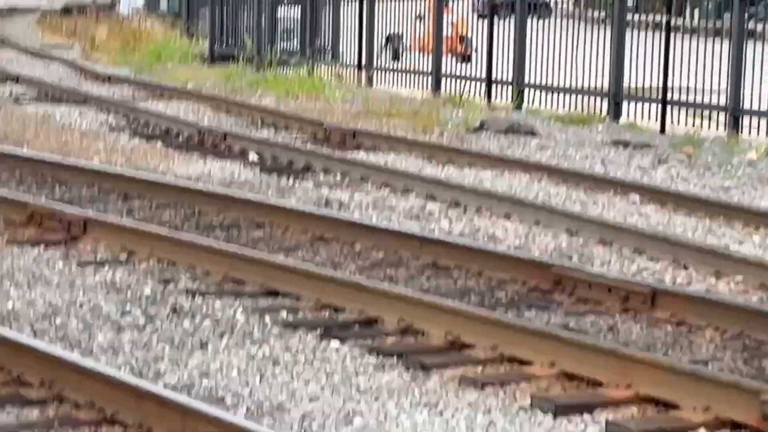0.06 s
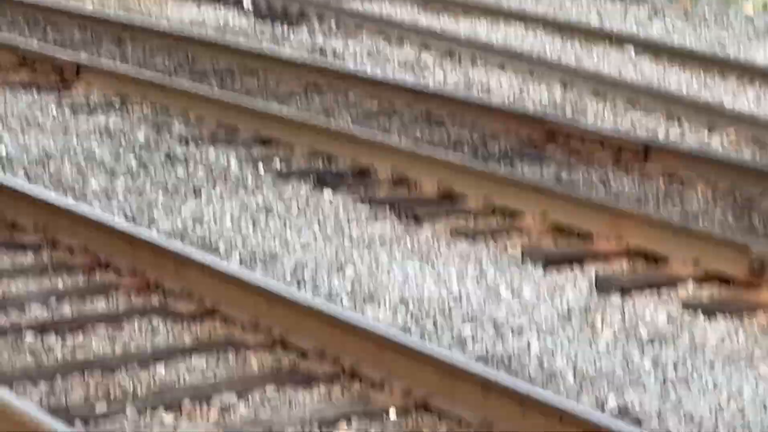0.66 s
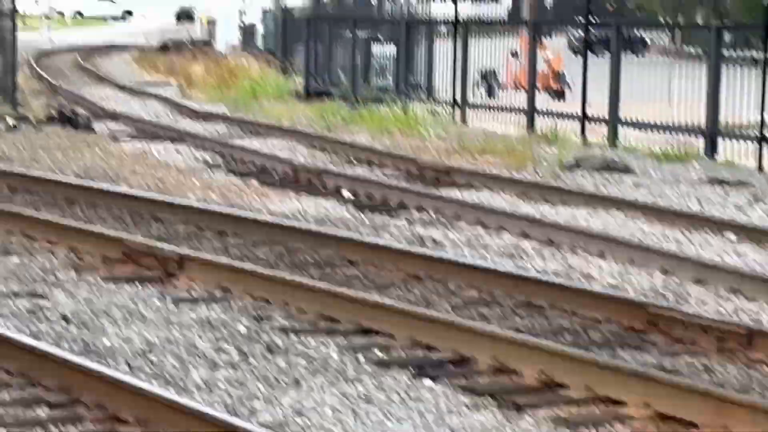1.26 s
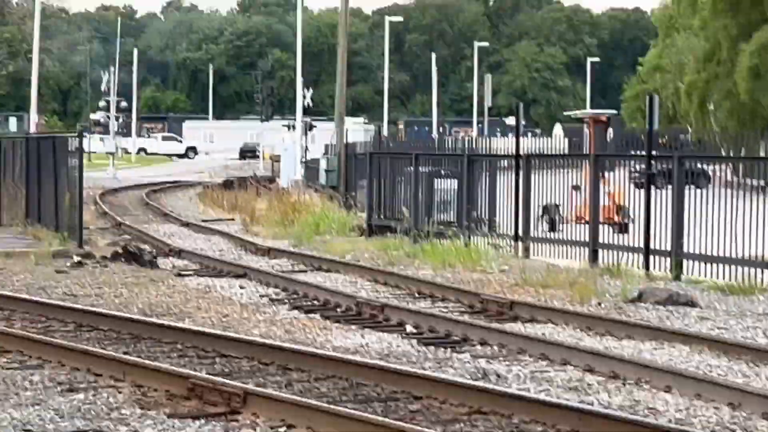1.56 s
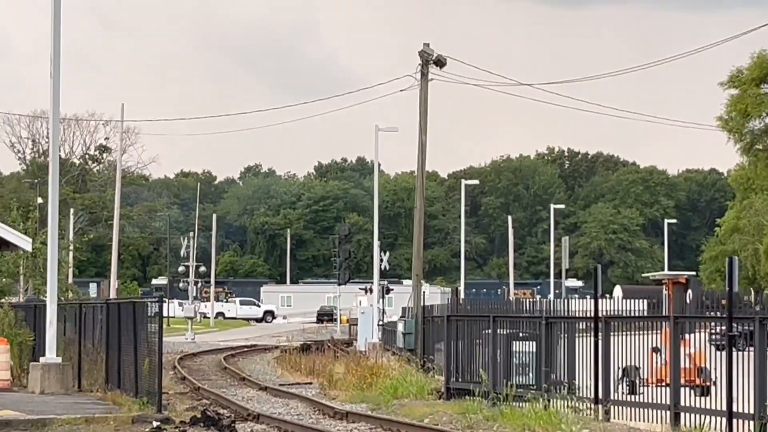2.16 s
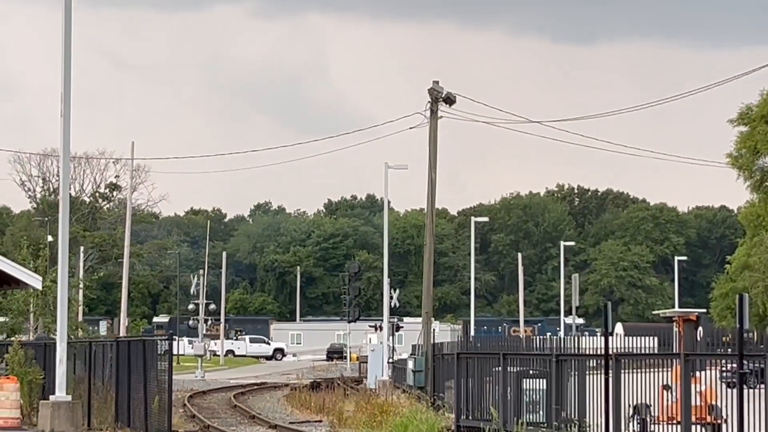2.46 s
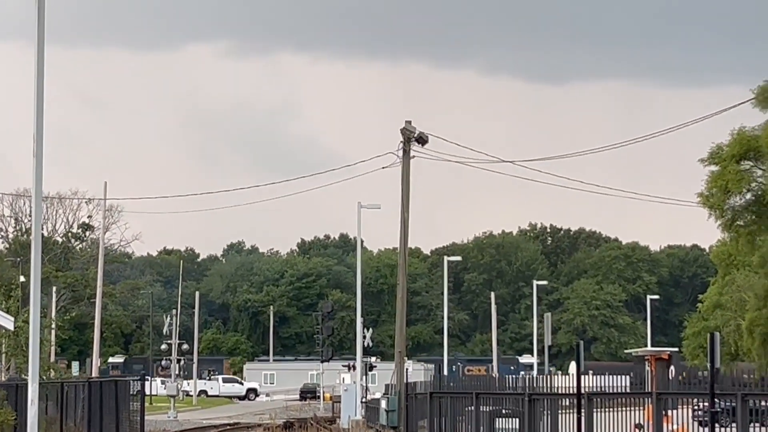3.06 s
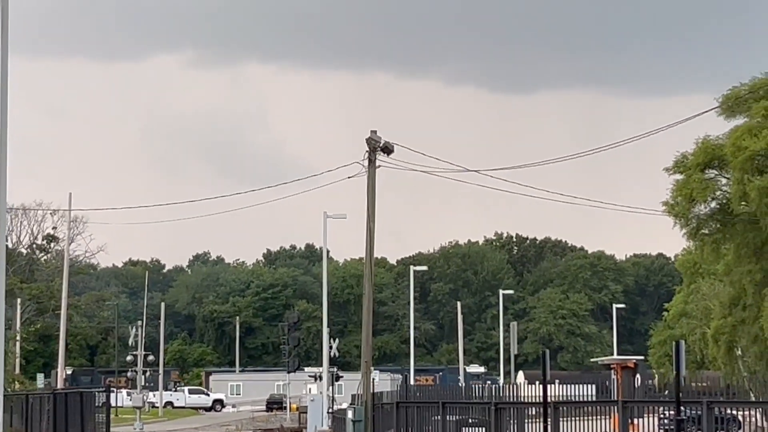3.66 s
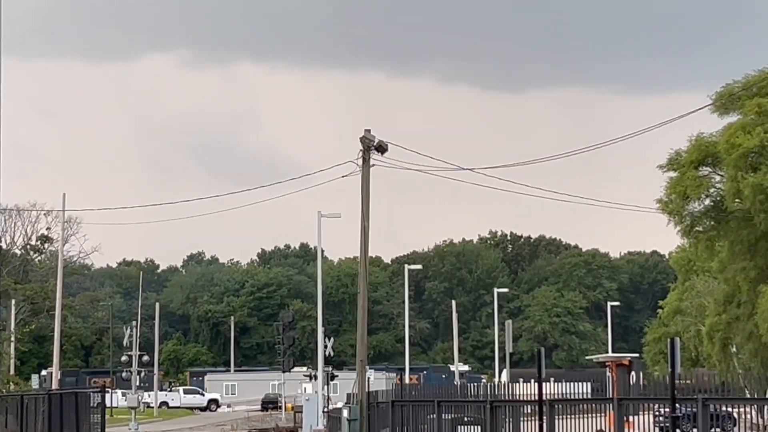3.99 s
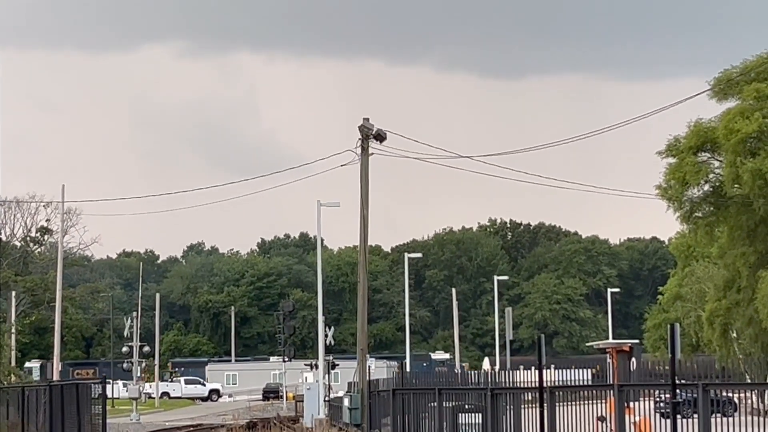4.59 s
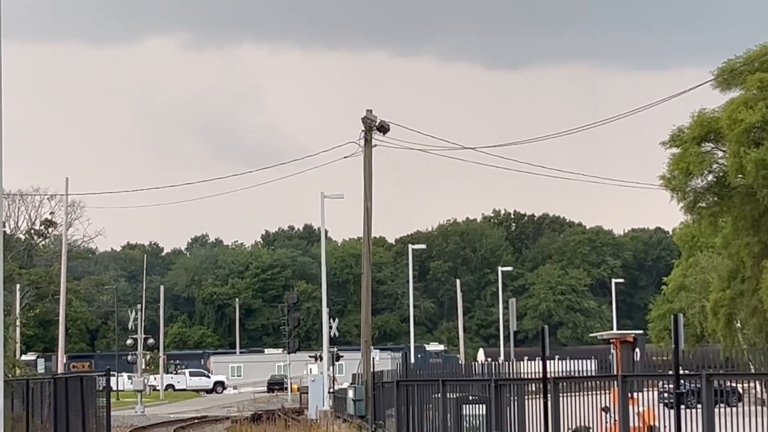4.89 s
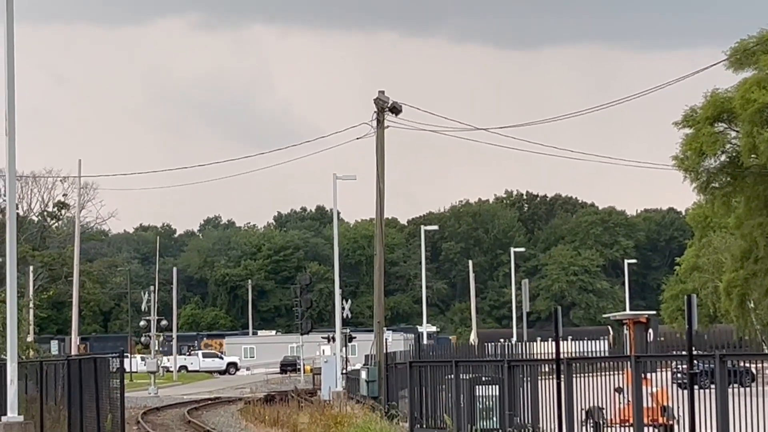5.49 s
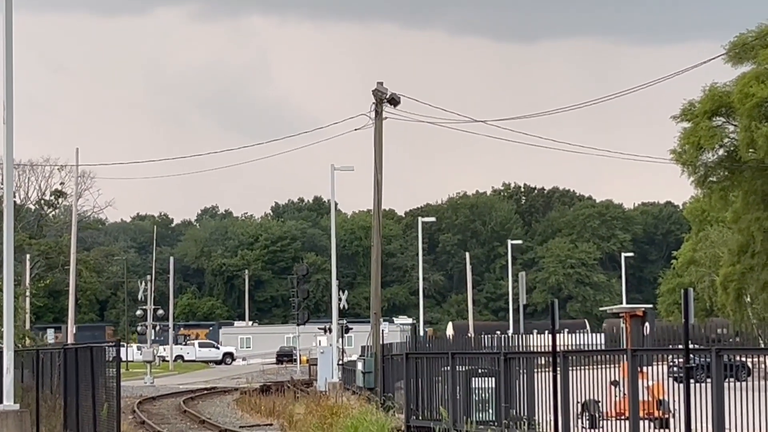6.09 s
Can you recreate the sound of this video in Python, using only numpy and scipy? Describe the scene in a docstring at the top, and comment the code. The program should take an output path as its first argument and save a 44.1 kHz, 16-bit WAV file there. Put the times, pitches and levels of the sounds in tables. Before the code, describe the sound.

A freight train creeps by with a low diesel throb and rumble, its wheels squealing in thin, high tones.

```python
"""Freight train creeping through a yard

Diesel exhaust throbs low, a gear hum climbs in pitch and rough wheels roar on the rails, cracking grit.
Car bodies knock, boom and growl. Flanges rub in a curve and set the wheels singing in thin, high tones
that swell, chirp and fade. It is all heard in stereo on a phone beside a crossing."""
import sys
import numpy as np
from scipy import signal
from scipy.fft import rfft, irfft
from scipy.io import wavfile
from scipy.ndimage import uniform_filter1d

SR = 44100
rng = np.random.default_rng(int(sys.argv[2]) if len(sys.argv) > 2 else 0)


def master(y):
    """Save y as 16-bit WAV."""
    cut = np.clip(np.atleast_2d(y).T, -1, 1)
    pcm = np.round(cut * 32767)  # scale
    wavfile.write(sys.argv[1], SR, pcm.astype(np.int16))


N = 279594
TIME = np.arange(N) / SR
FREQ = np.maximum(np.arange(N // 2 + 1) * SR / N, 1)

# colour of steel hissing on steel, rolling or scraping: (frequency [Hz], relative level [dB])
STEEL_HISS = [(2800, -18.5), (3600, -1), (4500, -3.5), (5200, -3.5), (6000, -8), (7000, -10), (8300, -21.5),
              (10000, -43.5)]


def undb(db):
    """Decibels to gain."""
    return 10 ** (np.asarray(db) / 20)


def curves(table):
    """One envelope per value column, in straight lines between the table's times."""
    times, *columns = np.transpose(table)
    return [np.interp(TIME, times, column) for column in columns]


def across(hz, values):
    """Values joined by straight lines on a log-frequency axis."""
    return np.interp(np.log(FREQ), np.log(hz), values)


def unit(x):
    """Scale to rms 1."""
    return x / np.sqrt(np.mean(x ** 2))


def noise(gain):
    """Mono noise with the given gain at each frequency, rms 1."""
    return unit(irfft(rfft(rng.standard_normal(N)) * gain, N))


def drift(hz, steps=4096):
    """Smooth random modulation that changes about hz times a second, rms 1."""
    rates = np.arange(steps // 2 + 1) * SR / N
    slow = irfft(rfft(rng.standard_normal(steps)) / (1 + (rates / hz) ** 4))
    return np.interp(TIME, np.linspace(0, N / SR, steps), unit(slow))


def place(x, pan_db):
    """Pan a mono sound, louder on the left by pan_db."""
    return x * undb(np.array([[pan_db], [-pan_db]]) / 2)


def stereo_noise(gain):
    """Noise at two microphone ports: a shared part shifted in phase, plus a diffuse part for each."""
    # stereo image: (frequency [Hz], left minus right [dB], left phase lead [rad], coherence [0-1])
    image = [(90, -0.5, -0.05, 1.0), (280, -2.1, 0.56, 0.95), (700, 0.8, 1.01, 0.8),
             (1100, -0.4, 1.72, 0.6), (1500, -7.4, 3.12, 0.72), (1850, -8.6, 0.59, 0.82),
             (2600, -1.6, 0.36, 0.97), (4000, -0.0, 0.08, 0.98), (5000, 0.1, -0.12, 0.98),
             (6400, -0.1, -0.99, 0.93), (7400, 0.0, -1.81, 0.77), (8500, -0.0, -3.14, 0.95),
             (9600, -0.0, 2.13, 0.74), (12000, 0.0, -0.0, 1.0)]
    hz, balance_db, lead, coherence = np.transpose(image)
    shared = np.clip(across(hz, coherence), 0, 1)
    to_left = undb(across(hz, balance_db) / 2) * np.exp(.5j * across(hz, np.unwrap(lead)))
    white = rfft(rng.standard_normal((3, N)))
    blend = np.sqrt(shared) * white[0] + np.sqrt(1 - shared) * white[1:]
    pair = irfft(gain * np.array([to_left, 1 / to_left]) * blend, N)
    return pair / np.std(pair.mean(0))


def wash(colour, flicker_db, flicker_hz):
    """A broad bed of noise whose level flickers."""
    hz, db = np.transpose(colour)
    skirts = np.minimum(FREQ / hz[0], 1) ** 4 * np.minimum(hz[-1] / FREQ, 1) ** 4
    return stereo_noise(undb(across(hz, db)) * skirts) * undb(flicker_db * drift(flicker_hz))


def sing(modes, steady=0.5, settle_s=0.048):
    """Resonances kept ringing by noise, as by friction; steady (0-1) evens out their joint loudness."""
    power = sum(undb(2 * db) / width / (1 + ((FREQ - hz) / width) ** 2) ** 2 for hz, width, db in modes)
    total_gain = np.sqrt(sum(undb(2 * db) for _, _, db in modes))
    ringing = stereo_noise(np.sqrt(power))
    loudness = np.sqrt(uniform_filter1d(np.mean(ringing ** 2, axis=0), int(settle_s * SR)))
    return unit(ringing / loudness ** steady) * total_gain


def turns(hz):
    """Phase of something turning at hz, from a random start."""
    return 2 * np.pi * (np.cumsum(hz) / SR + rng.random())


def hum(hz, wander, waver_db, overtone_db, rough=0):
    """A machine tone and its octave, wavering in pitch and level; rough adds a fast flutter."""
    phase = turns(hz * (1 + wander * drift(12.09)))
    octave = np.sin(2 * phase + drift(25)) * undb(overtone_db)
    waver = undb(waver_db * drift(2.2))
    flutter = unit(1 + rough * drift(26))
    return np.sqrt(2) * (np.sin(phase) + octave) * waver * flutter


def nearness(pass_s=1.5, late_s=0, closest_s=1.59):
    """How near the noisiest wheels seem: 1 at closest_s + late_s, a half pass_s before and after."""
    return np.exp(-((TIME - closest_s - late_s) / pass_s) ** 2 * np.log(2))


def passing(far_db, swell_db, pass_s, late_s=0):
    """Pass-by gain: up from the distant level by swell_db, then back down."""
    return undb(far_db + swell_db * nearness(pass_s, late_s))


def rubbing(cue, idle_db, attack_s=0.075, release_s=.08):
    """Gain of one sound: light steady contact, rubs that build, hold and ring out, and brief chirps."""
    # a wheel bears on the rail: (full strength from [s], hold [s], level [dB], cue label)
    rubs = [(0, 0.46, -42, "tread"), (.65, .25, -48, "tread"), (1.2, .5, -42.5, "tread"),
            (1.95, .6, -46.5, "tread"), (3.85, .2, -48, "tread"), (.45, 0.27, -56, "scrape"),
            (1.45, 0.28, -51.5, "scrape"), (2.3, 0.33, -51, "scrape"), (4.0, .45, -51.5, "scrape"),
            (4.8, 0.14, -53.5, "scrape"), (1.52, .08, -41, "growl"), (2.18, .06, -37.5, "growl"),
            (2.92, .3, -36.5, "growl"), (0, .45, -39, "boom"), (4.15, .62, -35, "boom"),
            (0, .5, -48, "groan"), (6.08, .1, -46.5, "groan"), (1.47, .6, -59, "first"),
            (2.15, .87, -49.5, "first"), (3.1, .4, -59, "first"), (3.52, .65, -51.5, "first"),
            (4.22, 1.3, -49.5, "first"), (5.62, .72, -53.5, "first"), (.3, .2, -54, "second"),
            (1.54, .17, -54, "second"), (2.44, .1, -46.5, "second"), (2.7, .75, -49, "second"),
            (4.26, .05, -49.5, "second"), (5.0, .55, -54.5, "second"), (6.21, .1, -46.5, "second"),
            (.04, .11, -46, "third"), (.45, 1.25, -55, "third"), (2.24, .24, -46.5, "third"),
            (2.87, .5, -54, "third"), (4.26, .05, -53, "third"), (5.3, .33, -45.5, "third"),
            (1.42, .32, -54, "fourth"), (4.3, .28, -55, "fifth"), (6.05, .25, -59, "fifth"),
            (2.26, .17, -50.5, "sixth"), (0, .13, -58, "low"), (4.0, 1.1, -57.5, "low"),
            (5.85, .49, -62, "low"), (0, .1, -57, "high"), (3.97, .26, -50.5, "high"),
            (4.32, .11, -55, "high"), (4.58, .1, -63, "high"), (4.85, .28, -60.5, "high"),
            (5.3, .6, -69, "high"), (0, .08, -54.5, "thin"), (4.06, .19, -52, "thin"),
            (4.35, .15, -58.5, "thin"), (4.78, .26, -56, "thin"), (5.19, .04, -56.5, "thin"),
            (5.8, .16, -58, "thin"), (6.22, .12, -58, "thin"), (1.57, .05, -65, "top"),
            (4.06, .14, -59, "top"), (4.47, .05, -60, "top"), (4.98, .2, -61, "top"),
            (2.85, .4, -68, "whistle")]
    # a flange catches and lets go at once: (peak time [s], length [s], level [dB], cue label)
    chirps = [(2.22, .04, -46, "first"), (2.98, .05, -48, "first"), (3.5, .04, -48, "first"),
              (3.96, .025, -45, "first"), (4.24, .05, -44, "first"), (4.31, .03, -42.5, "first"),
              (4.44, .025, -44.5, "first"), (4.58, .025, -46, "first"), (4.66, .025, -46, "first"),
              (4.82, .03, -48, "first"), (4.97, .05, -40, "first"), (5.09, .04, -47, "first"),
              (5.17, .06, -46.5, "first"), (5.28, .035, -44, "first"), (5.41, .055, -45.5, "first"),
              (5.5, .04, -47.5, "first"), (5.72, .035, -44, "first"), (5.765, .025, -43.5, "first"),
              (6.13, .03, -49, "first"), (5.79, .05, -48.5, "second"), (6.04, .08, -44.5, "second"),
              (5.99, .035, -44, "squeak"), (4.26, .03, -50.5, "screech"), (4.4, .07, -45, "screech"),
              (4.85, .03, -55, "screech"), (5.0, .07, -51.5, "screech")]
    power = undb(2 * idle_db)
    for start, hold, db, label in rubs:
        if label == cue:
            before, after = np.maximum(start - TIME, 0), np.maximum(TIME - start - hold, 0)
            power = power + (undb(db) * np.exp(-before / attack_s - after / release_s)) ** 2
    for peak, length, db, label in chirps:
        if label == cue:
            power = power + undb(2 * db) * .5 ** ((2 * (TIME - peak) / length) ** 2)
    return np.sqrt(power)


def yard_machines():
    """Machines around the yard hold faint, steady tones."""
    # machine tones: (frequency [Hz], width [Hz], level [dB])
    tones = [(799, 5, -49), (1099, 13, -55), (1567, 11, -61), (9513, 5, -83), (9687, 6, -84)]
    return sing(tones)


def ground_rumble():
    """The ground rumbles under the train, slowly heaving in level."""
    # colour of the rumble: (frequency [Hz], relative level [dB])
    colour = [(18, -28.5), (30, -15.5), (42, -4), (55, 1), (72, 5.5), (90, 4), (115, -5), (140, -12),
              (200, -25)]
    return wash(colour, flicker_db=1.5, flicker_hz=0.66) * undb(-24.5)


def drone(start_s=4.3, attack_s=.6, start_hz=64.3, rise_hz_per_s=2.1):
    """A low tone fades in late and creeps sharp."""
    age = TIME - start_s
    tone = hum(start_hz + rise_hz_per_s * age, wander=0.0064, waver_db=4.0, overtone_db=-30.5)
    return tone * np.clip(age / attack_s, 0, 1) * undb(-25.5)


def locomotives(firing_hz=87.1, wander=0.00267, rough=0.0066, slip_rad=0.69, waver_db=0):
    """Two diesels blend into one firing tone; uneven cylinders add shaft orders that beat against it."""
    # swell and sag of the exhaust's firing tone: (time [s], level [dB])
    exhaust = [(0.0, -7), (0.21, -9.5), (0.3, -15), (0.44, -12.5), (0.47, -10.5), (0.58, -9), (0.92, -13.5),
               (1.18, -11), (1.71, -19), (2.24, -11), (2.49, -21.5), (2.67, -12), (2.81, -18), (3.57, -8.5),
               (3.74, -13), (3.83, -31), (3.94, -11), (4.13, -12), (4.17, -32), (4.2, -20), (4.39, -11),
               (4.58, -12.5), (4.67, -24), (4.75, -18), (5.33, -14), (5.38, -22.5), (5.58, -8), (5.79, -10),
               (5.83, -16), (6.25, -9.5), (6.34, -19)]
    # crankshaft of each locomotive: (rate [Hz])
    shafts = [10.71, 10.92]
    # weaker tones around the firing tone: (multiple of shaft rate, level [dB])
    orders = [(5, -37.5), (6, -41), (7, -34.5), (9, -28.5), (10, -43), (11, -39)]
    exhaust_db, = curves(exhaust)
    firing = np.sin(turns(firing_hz * (1 + wander * drift(1.61))))
    throb = firing * undb(exhaust_db - 0.9) * (1 + rough * drift(14))
    for shaft_hz in shafts:
        shaft = turns(shaft_hz * (1 + wander * drift(3.2)))
        for order, db in orders:
            phase = order * shaft + slip_rad * drift(1.5) + 2 * np.pi * rng.random()
            throb += undb(db) * unit(undb(waver_db * drift(3.5))) * np.sin(phase)
    return np.sqrt(2) * throb


def gears(slow_hz=212, full_hz=281, steepest_s=1.65, spread_s=1.15):
    """The rough gear hum climbs along an S-curve as the drive gathers speed."""
    # envelopes of the hum: (time [s], fundamental level [dB], octave level [dB])
    levels = [(0, -41, -50), (1.2, -41, -50), (1.4, -33, -49), (2.1, -30.5, -41), (2.3, -39, -39),
              (2.65, -33.5, -41), (2.85, -35, -50), (3.35, -32.5, -46), (3.5, -52, -44), (4.3, -54, -57),
              (4.7, -41, -57), (5.6, -40, -57), (6.34, -47, -57)]
    tone_db, octave_db = curves(levels)
    speed = 1 / (1 + np.exp((steepest_s - TIME) / spread_s))
    hz = slow_hz + (full_hz - slow_hz) * speed
    return hum(hz, wander=0.009, waver_db=1.5, overtone_db=octave_db - tone_db, rough=0.5) * undb(tone_db)


def rolling():
    """Rough treads roll by: cars roar, steel rings and hisses, grit sizzles, all swelling at the pass."""
    # colours of the low roar, mid ring and top sizzle: (frequency [Hz], relative level [dB])
    car_roar = [(90, -17.5), (150, 1.5), (200, -1), (300, -5), (370, -3.5), (520, -8), (720, -10.5),
                (860, -11), (1050, -14.5), (1500, -44.5)]
    steel_ring = [(850, -20), (1150, -0.5), (1500, -0.5), (1800, -4), (2050, -4.5), (2300, -10), (2800, -9),
                  (3300, -10.5), (4200, -28.5)]
    grit_sizzle = [(7800, -36.5), (9200, 4), (10500, -6.5), (12000, -11), (14000, -19), (15500, -45.5)]
    roar = wash(car_roar, flicker_db=1.12, flicker_hz=16)
    ring = wash(steel_ring, flicker_db=0.8, flicker_hz=29)
    hiss = wash(STEEL_HISS, flicker_db=0.94, flicker_hz=26)
    sizzle = wash(grit_sizzle, flicker_db=0, flicker_hz=60)
    return (roar * passing(far_db=-33.5, swell_db=6.0, pass_s=1.49, late_s=0.056)
            + ring * passing(far_db=-43, swell_db=3.5, pass_s=1.1)
            + hiss * passing(far_db=-53.5, swell_db=3.5, pass_s=1.6)
            + sizzle * passing(far_db=-74, swell_db=10.5, pass_s=2.1))


def grit_crackle(decay_s=0.0024, centre_hz=10900, width_hz=1100, faint_per_s=70):
    """Grit cracks under the wheels: a few clear ticks in a fine crackle that thickens as they near."""
    # dry ticks that stand out: (time [s], relative level [dB])
    ticks = [(0.648, -49), (0.8241, -45), (1.0062, -44), (1.2022, -47), (1.283, -50), (1.4666, -47),
             (1.6397, -43), (1.9266, -44), (1.9924, -46), (2.0179, -43), (2.3317, -48), (2.4908, -42),
             (2.5761, -44), (2.7602, -42), (2.7786, -42), (3.1383, -44), (4.8235, -54)]
    hits = rng.random(N) < faint_per_s * nearness() ** 2 / SR
    cracks = hits * undb(-62 + 3 * rng.standard_normal(N))
    for start, db in ticks:
        cracks[int(start * SR)] += undb(db - 6)
    envelope = signal.lfilter([1], [1, -np.exp(-1 / (decay_s * SR))], cracks)
    return envelope * noise(np.exp(-((FREQ - centre_hz) / width_hz) ** 2 / 2))


def rail_joints(rise_s=0.014):
    """A wheel drops over a joint and jolts the car body: a soft knock, smeared by distance."""
    # dull knocks: (time [s], level [dB])
    knocks = [(.592, -35), (.636, -28.5), (.664, -25.5), (.835, -36), (5.35, -37)]
    # modes of the jolted body: (frequency [Hz], width [Hz], relative level [dB])
    body_modes = [(238, 35, 0), (520, 220, -5.5), (830, 220, -3)]
    envelope = np.zeros(N)
    for start, db in knocks:
        age = np.maximum(TIME - start, 0) / rise_s
        envelope += undb(db) * age * np.exp((1 - age ** 2) / 2)
    return envelope * unit(sing(body_modes, steady=.8))


def car_bodies():
    """The hollow cars boom, groan and growl as they sway."""
    # body resonances, low to high: (frequency [Hz], width [Hz], relative level [dB])
    boom = [(134, 9, 0), (158, 16, -5)]
    growl = [(376, 53, -0.5), (480, 98, -5)]
    groan = [(1100, 60, -2), (1450, 130, 0)]
    return (sing(boom) * rubbing("boom", idle_db=-50)
            + sing(growl) * rubbing("growl", idle_db=-66)
            + sing(groan) * rubbing("groan", idle_db=-64.5))


def tread_grind():
    """Treads grind on the rail head and stir broad midrange resonances."""
    # grinding modes: (frequency [Hz], width [Hz], relative level [dB])
    modes = [(1720, 31, -1.5), (1860, 220, -0.5)]
    return sing(modes) * rubbing("tread", idle_db=-55)


def flange_scrape():
    """Flanges scrape along the rail in short swells of hiss."""
    return wash(STEEL_HISS, flicker_db=-0.6, flicker_hz=9) * rubbing("scrape", idle_db=-70.5)


def wheel_squeal():
    """Flanges rub in the curve and each wheel sings in its own narrow modes."""
    # modes of the singing wheels: (frequency [Hz], width [Hz], relative level [dB])
    first_wheel = [(2481, 8, 0), (2497, 8, -6), (2830, 25, -15)]
    second_wheel = [(3092, 9, 0)]
    third_wheel = [(3169, 8, 0)]
    fourth_wheel = [(3332, 25, 0), (4242, 18, -2), (5152, 30, -9)]
    fifth_wheel = [(3015, 10, 0), (3564, 14, -7)]
    # a slightly lower tone that briefly beats against the third wheel's squeal: (same columns)
    third_wheel_beat = [(3144, 8, 0)]
    beat_cue = "sixth"  # label of the rub that swells the third wheel's beating tone
    # more wheel modes, from squeak up to whistle: (frequency [Hz], width [Hz], relative level [dB])
    squeak = [(1890, 12, 0)]
    low_squeal = [(3374, 18, 2.5), (4287, 12, -1), (4750, 12, -6.5)]
    screech = [(4285, 10, 0)]
    thin_squeal = [(5220, 22, 0)]
    high_squeal = [(6150, 14, 0), (10578, 20, -28)]
    top_squeal = [(7074, 12, 0), (7989, 9, -14)]
    whistle = [(13355, 8, 0)]
    return (sing(first_wheel, steady=.55, settle_s=.035) * rubbing("first", idle_db=-66)
            + sing(second_wheel, steady=.7) * rubbing("second", idle_db=-54.5)
            + sing(third_wheel, steady=.8) * rubbing("third", idle_db=-55)
            + sing(fourth_wheel) * rubbing("fourth", idle_db=-79.5)
            + sing(fifth_wheel) * rubbing("fifth", idle_db=-81)
            + sing(third_wheel_beat) * rubbing(beat_cue, idle_db=-70)
            + sing(squeak, steady=.9, settle_s=.02) * rubbing("squeak", idle_db=-75.5)
            + sing(low_squeal) * rubbing("low", idle_db=-63)
            + sing(screech, steady=.9, settle_s=.02) * rubbing("screech", idle_db=-78.5)
            + sing(high_squeal, steady=.75, settle_s=.03) * rubbing("high", idle_db=-73)
            + sing(thin_squeal) * rubbing("thin", idle_db=-68)
            + sing(top_squeal, steady=.7) * rubbing("top", idle_db=-83.5)
            + sing(whistle) * rubbing("whistle", idle_db=-110, attack_s=.01))


def scene():
    """Engines and rumble at the bottom, rolling noise in the middle, singing wheels on top."""
    engines = place(locomotives() + drone(), pan_db=-.55)
    drive = place(gears(), pan_db=-4.5)
    track = ground_rumble() + rolling() + rail_joints()
    friction = tread_grind() + car_bodies() + flange_scrape() + wheel_squeal()
    return engines + drive + track + friction + yard_machines() + grit_crackle()


def record(dry, top_hz=14400):
    """The phone cuts the top treble with a steep low-pass."""
    return signal.sosfilt(signal.ellip(8, .2, 70, top_hz, fs=SR, output="sos"), dry)


dry = scene()
out = record(dry)
master(out)
```